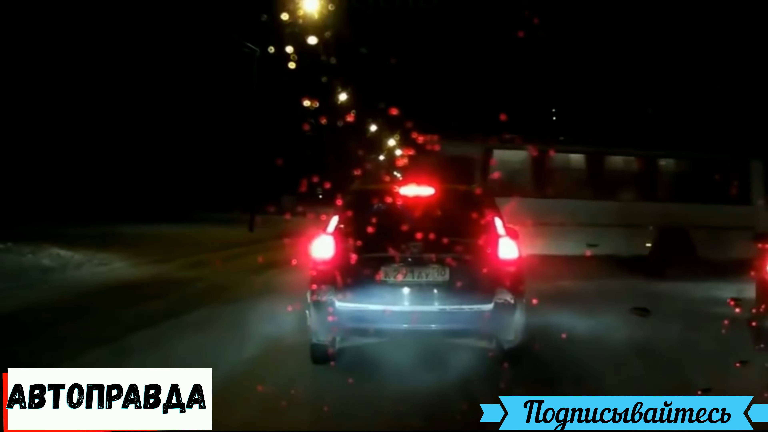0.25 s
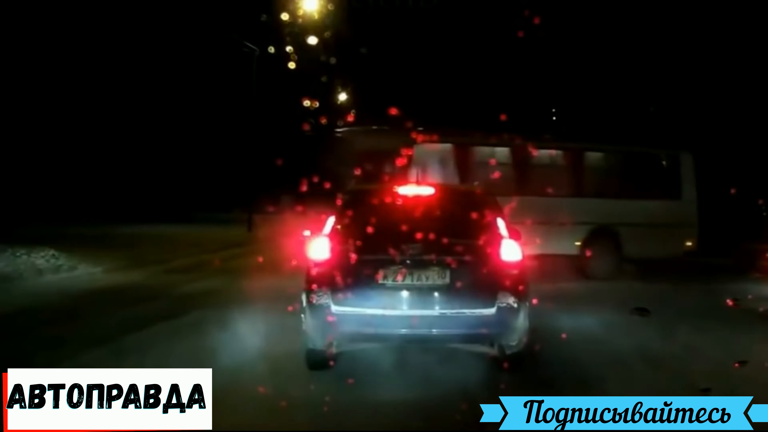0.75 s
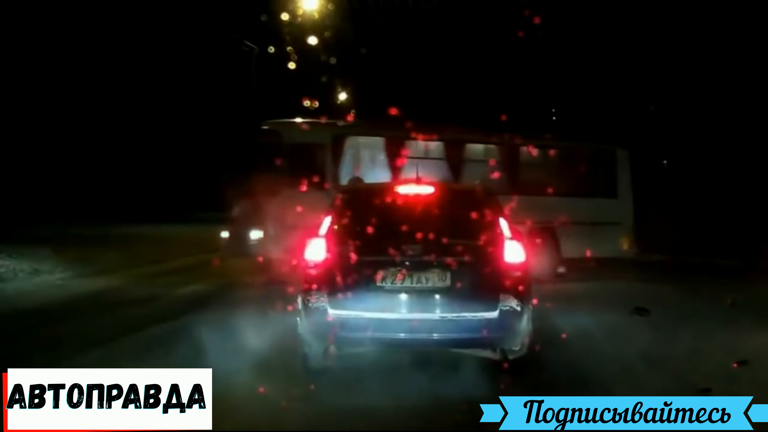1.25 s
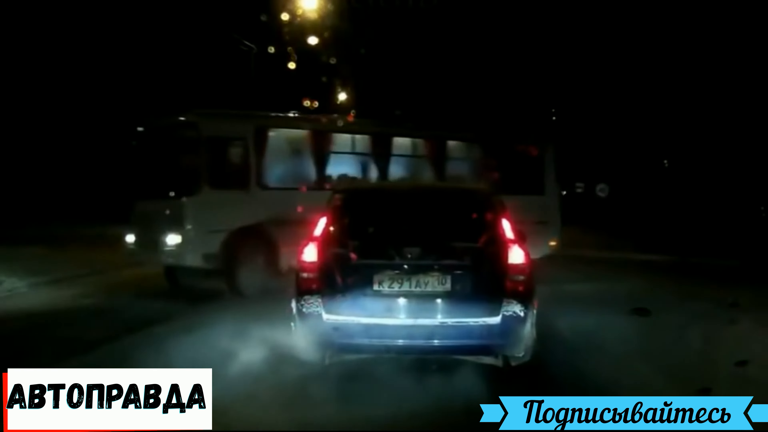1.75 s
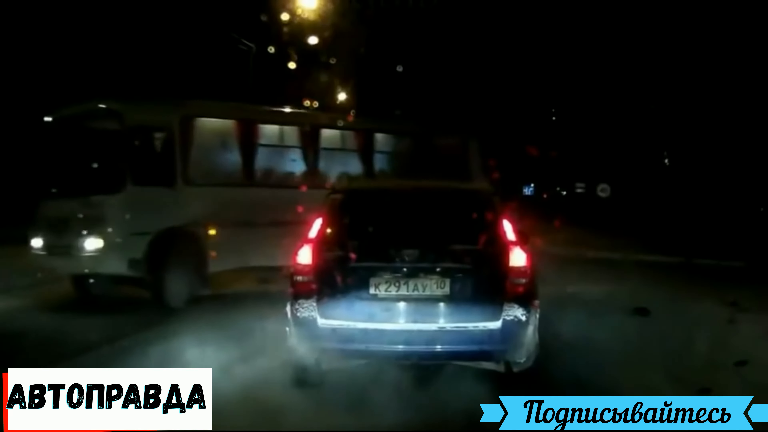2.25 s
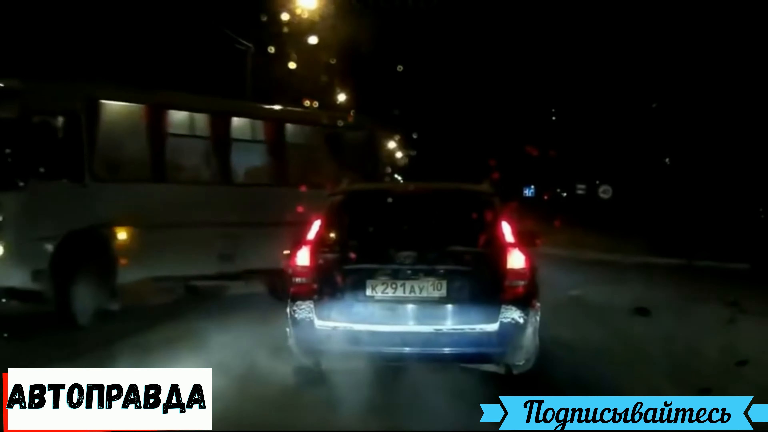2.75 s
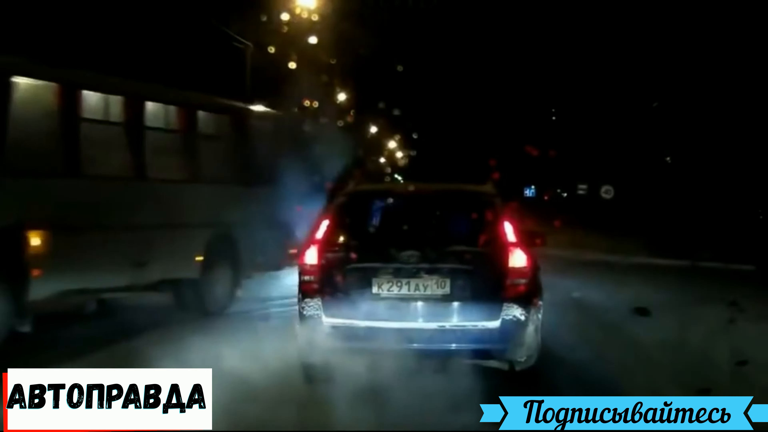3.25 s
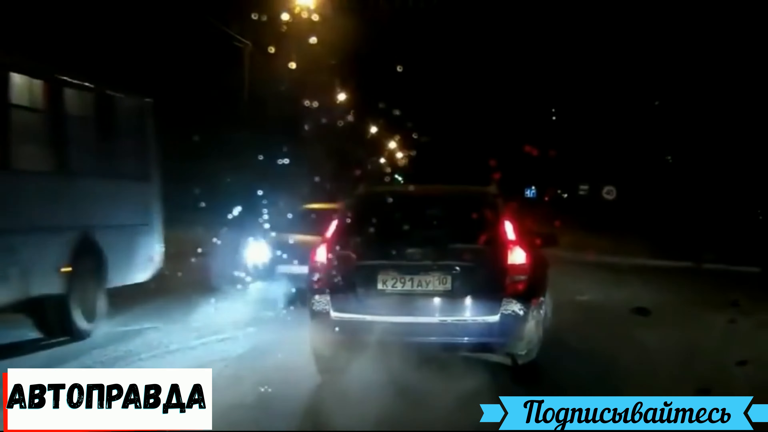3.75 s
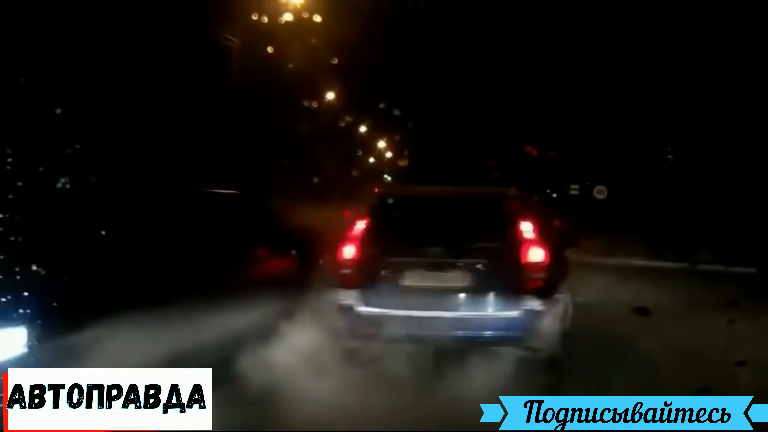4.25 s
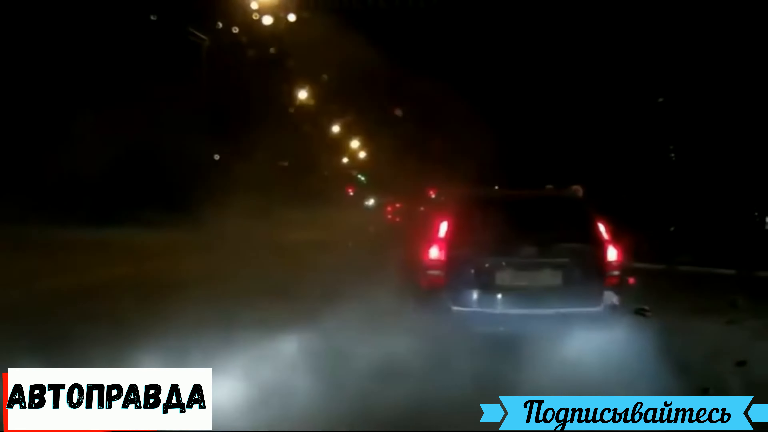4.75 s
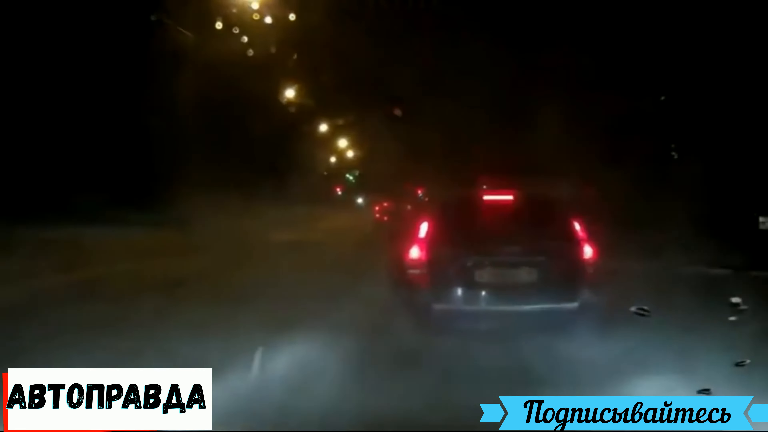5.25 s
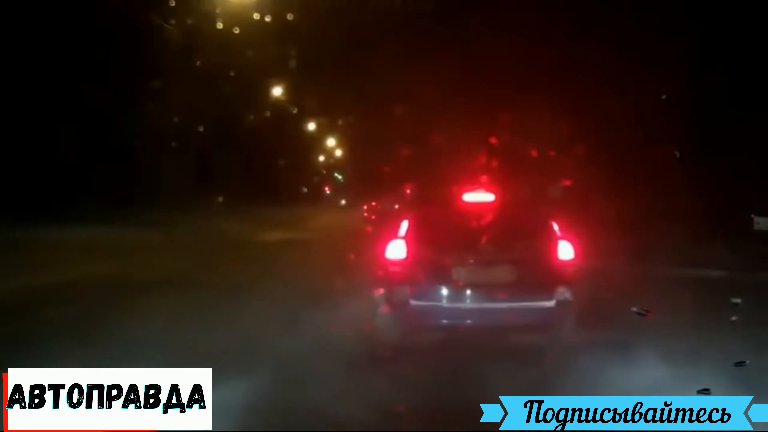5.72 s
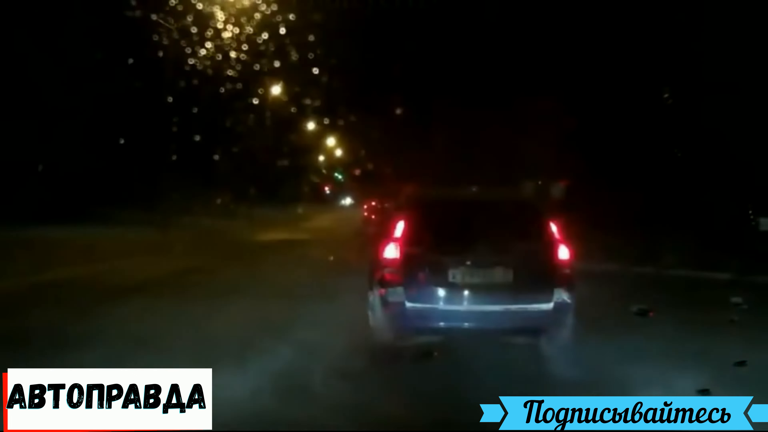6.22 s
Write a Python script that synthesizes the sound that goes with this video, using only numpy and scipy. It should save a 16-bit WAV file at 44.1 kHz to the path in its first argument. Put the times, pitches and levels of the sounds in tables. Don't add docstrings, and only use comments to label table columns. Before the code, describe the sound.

Quiet cabin rumble and fan noise, a bus engine passing, a short skid, two violent crunching metal blows, then sharp debris clicks on the road.

```python
import sys
import numpy as np
from scipy import signal
from scipy.fft import rfft, irfft
from scipy.io import wavfile
from scipy.ndimage import uniform_filter1d

SR = 44100
rng = np.random.default_rng(int(sys.argv[2]) if len(sys.argv) > 2 else 0)


def ratio(d):
    e = np.asarray(d, float) / 20
    return 10 ** e


def to_wav(s):
    ch = np.atleast_2d(s).T
    pcm = np.round(np.clip(ch, -1, 1) * 32767)
    wavfile.write(sys.argv[1], SR, pcm.astype(np.int16))


N = 286089
t = np.arange(N) / SR
f = np.fft.rfftfreq(N, 1 / SR)


def unit(x):
    return x / np.sqrt(np.mean(x ** 2))


def track(rows, col):
    rows = np.array(rows)
    first, last = rows[0, 0], rows[-1, 0]
    gate = np.interp(t, [first - 0.037, first, last, last + 0.037], [0, 1, 1, 0])
    return np.interp(t, rows[:, 0], rows[:, col]), gate


def gain(rows, col):
    db, gate = track(rows, col)
    return ratio(db) * gate


def swell(rows):
    levels = []
    for start, top, attack, release, hold in rows:
        before = (start - t) / attack
        after = np.maximum(t - start - hold, 0) / release
        levels.append(top - 20 * np.maximum(before, after))
    return ratio(np.max(levels, axis=0))


def shape(points):
    hz, db = np.transpose(points)
    return ratio(np.interp(np.log(f + 1), np.log(hz), db))


def peak(hz, width):
    return 1 / (1 + 1j * (f / hz - hz / (f + 1e-9)) * hz / width)


def through(x, response):
    return unit(irfft(rfft(x) * response, N))


def body(x, modes):
    return through(x, sum(ratio(db) * peak(hz, width) ** 2 for hz, width, db in modes))


def walk(rate):
    return through(rng.standard_normal(N), 1 / (1 + (f / rate) ** 2))


def grains(rate, scatter_db, wash):
    size = ratio(scatter_db * rng.exponential(size=N))
    ticks = (rng.random(N) < rate / SR) * rng.standard_normal(N) * size
    return unit(ticks) + wash * rng.standard_normal(N)


def tone(hz, size, wobble):
    phase = 2 * np.pi * np.cumsum(hz * (1 + wobble * walk(6.13))) / SR
    return np.sqrt(2) * size * ratio(0.48 * walk(24)) * np.sin(phase)


# f/Hz, width/Hz, level/dB
FLOOR_MODES = [(116.2, 25.3, -0.5), (140.7, 15, -0.5)]
DOOR_MODES = [(198, 34, -2.5), (247, 24, -1.5), (288, 31, -5.5), (323.3, 27, -3.5)]
BUCKLE_MODES = [(404, 56, -0.5), (490, 54, -5.5), (600, 57, -5.5), (696, 98, -8.5), (874, 29, -9.5),
                (1026, 215, -16.5)]
# f/Hz, level/dB per Hz
TEAR_SPECTRA = [
    [(710, -34), (1200, -8.5), (1400, -7.5), (1580, -15), (1900, -3.5), (2040, -6), (2300, 0.5), (2940, 0), (4300, -7), (4900, -24), (6110, -53), (10300, -120)],
    [(710, -18), (1200, -6.5), (1410, -3), (1620, -11), (1770, -7), (1940, -6), (2620, -2), (2940, -6), (4200, -11), (6000, -35), (7800, -57), (13200, -120)],
]
# t/s, peak level/dB, attack/s, release/s (each per 20 dB), hold/s
FLOOR_HITS = [(4.265, -21, .065, .055, 0.041), (4.366, -21, 0.12, 0.055, .003),
              (4.505, -25, .012, .05, .012), (4.555, -16, 0.055, 0.086, 0.0034),
              (4.614, -12, 0.018, 0.125, 0.023), (4.68, -15, .1, .05, 0.049),
              (4.826, -30, 0.11, .075, .003)]
DOOR_HITS = [(4.255, -22.5, .06, 0.099, 0.066), (4.36, -33, .1, .045, 0.078), (4.54, -21, .05, .06, .03),
             (4.602, -11, 0.079, .06, 0.0033), (4.63, -11.5, .075, 0.091, 0.044),
             (4.72, -23, .1, 0.076, .06), (4.85, -35, .1, .1, .1)]
CRUMPLE = [(4.27, -18, 0.045, 0.071, 0.03), (4.36, -35, .1, .07, .06), (4.55, -21.5, .09, .13, .05),
           (4.665, -15.5, 0.17, 0.055, .01), (4.73, -30, .1, .15, 0.047), (4.85, -37, .1, 0.22, 0.08)]
RIPS = [
    [(4.255, -25, 0.035, .03, 0.035), (4.302, -23, .02, .035, .014), (4.345, -39, .03, 0.03, .016),
     (4.4, -45, .1, .05, .01), (4.438, -39, 0.06, 0.02, .003)],
    [(4.5, -34, 0.052, .2, .07), (4.65, -27.5, 0.26, 0.12, .03), (4.74, -38, .1, 0.36, 0.032),
     (4.88, -45, .1, 0.1, 0.13)],
]
BOOM = [
    (4.582, -22, 0.2, .03, .003),
    (4.64, -4.5, 0.016, 0.06, 0.043),
]


def crash():
    knocks = grains(500, scatter_db=2.5, wash=0.81)
    tearing = ratio(2.14 * walk(54)) * grains(3000, scatter_db=-6.0, wash=2.55)
    out = ratio(1.5) * tone(53.5, swell(BOOM), 0.0204)
    out = out + swell(FLOOR_HITS) * body(knocks, FLOOR_MODES)
    out = out + swell(DOOR_HITS) * body(knocks, DOOR_MODES)
    out = out + swell(CRUMPLE) * body(knocks, BUCKLE_MODES)
    for rows, spectrum in zip(RIPS, TEAR_SPECTRA):
        out = out + swell(rows) * through(tearing, shape(spectrum))
    return out


# t/s, peak level/dB, f/Hz, length/s
SQUEALS = [(3.685, -40, 3200, .02), (3.76, -50, 2300, .04), (4.252, -26, 2570, .006),
           (4.263, -24, 2870, .006), (4.278, -27, 3300, .008), (4.288, -28, 1943, .009),
           (4.305, -23, 2290, .005), (4.313, -25, 2440, .007), (4.425, -35, 3040, .005),
           (4.433, -33, 2514, .007), (4.5, -37, 2550, .006), (4.521, -22, 2600, .007),
           (4.545, -23, 2546, .008), (4.567, -29, 2270, .008), (4.579, -30, 2395, .004),
           (4.601, -28, 2290, .007), (4.617, -24, 2640, .011), (4.626, -30, 2088, .007),
           (4.651, -26, 2648, .004), (4.679, -25, 2530, .009), (4.696, -31, 2395, .005),
           (4.744, -30, 2653, .005)]
PANEL_NOTES = [(3.597, -37, 1394, .015), (3.575, -34, 242, .015), (3.62, -38, 581, .015),
               (3.637, -37, 850, .016), (3.667, -39, 796, .012), (3.68, -34, 586, .04),
               (3.47, -38, 198, .06), (4.005, -39, 1200, .02), (4.272, -10, 107, .025),
               (4.285, -21, 253, .014), (4.292, -13, 403, .013), (4.285, -20, 490, .015),
               (4.305, -11, 123, .022), (4.313, -17, 220, .02), (4.361, -17, 125, .025),
               (4.515, -12, 139, .013), (4.56, -9, 134, .018), (4.569, -20, 446, .015),
               (4.573, -22, 694, .011), (4.597, -9, 244, .019), (4.608, -15, 330, .022),
               (4.612, -25, 608, .012), (4.622, -5, 134, .017), (4.648, -14, 225, .02),
               (4.66, -15, 370, .014), (4.662, -22, 554, .009), (4.674, -24, 850, .015),
               (4.734, -14, 118, .018), (4.824, -21, 123, .018), (4.85, -32, 310, .02),
               (4.98, -38, 700, .012), (5.309, -47, 5230, .007), (5.375, -37, 3130, .012),
               (5.4, -41, 3500, .01)]


def squeals_and_panel_notes():
    rough = walk(93)
    out = np.zeros(N)
    for start, db, hz, length in SQUEALS + PANEL_NOTES:
        envelope = ratio(db + 1.8 * rough) * np.exp(-((t - start) / length) ** 2)
        out += envelope * np.sin(2 * np.pi * hz * t + 0.98 * min(hz / 2000, 1) * rough)
    return out


# t/s, peak level/dB, centre f/Hz, spread/octaves
SHARDS = [(4.972, -27, 2000, 0.9), (5.1563, -16, 4100, 0.28), (5.2794, -34, 3534, 0.39),
          (5.3495, -5.5, 3140, 0.43), (5.4645, -23, 4000, 0.65), (5.48, -8, 3800, 0.45),
          (5.4984, -25, 3900, 0.6), (5.5498, -12.5, 3500, 0.25), (5.5668, -19, 3400, 0.5),
          (5.6125, -26, 2720, 0.52), (5.654, -30, 3840, 0.5), (5.677, -33, 2600, 0.5),
          (5.7189, -31, 3740, 0.5), (5.7894, -38, 4150, 0.5), (5.842, -30, 4180, 0.44),
          (5.862, -33, 4100, .5), (5.915, -33, 4000, .4), (5.952, -32, 4040, 0.38),
          (5.9833, -28, 3940, 0.63), (6.0825, -24, 4500, 0.55), (6.094, -15.5, 2970, 0.37),
          (6.219, -30, 2940, 0.42), (6.238, -32.5, 4290, 0.38), (6.4156, -33, 2890, 0.62),
          (6.4804, -18, 4200, 0.5)]
# the same, then chatter/s
SLIPS = [(5.356, -12, 3400, 0.6, 0.004), (5.48, -27, 1400, .5, .003), (5.55, -30, 1500, .5, .003),
         (5.351, -18, 1080, 0.83, 0.0088), (5.482, -17, 3000, 0.45, 0.006),
         (5.516, -31, 2520, 0.61, 0.0037), (5.569, -21, 3600, 0.55, 0.008),
         (5.621, -27, 3980, 0.63, 0.0081), (5.692, -27.5, 3780, 0.68, 0.013), (5.54, -41, 6000, .3, .002),
         (6.0212, -15, 5200, 0.95, .007), (6.022, -28, 1200, .6, .006), (6.03, -21, 4300, 0.73, 0.006),
         (6.084, -27, 4300, .55, .006), (6.097, -25, 3100, .45, .008), (5.552, -22, 3400, .5, .005),
         (6.038, -24, 3870, 0.57, 0.004), (6.047, -36, 4800, .4, .004), (6.066, -34, 4100, .3, .002),
         (6.2, -27, 1106, 0.4, 0.03), (6.481, -28, 2055, 0.35, 0.0038)]


def shard_hit(db, hz, spread, chatter_s):
    u = np.arange(4096) / SR
    chance = rng.standard_normal((3, 60, 1))
    pitch = np.geomspace(700, 7400, num=60)[:, None] * 2 ** (0.01 * chance[0])
    octaves = np.log2(pitch / hz) / max(spread, 0.3)
    weight_db = -9 * np.abs(octaves) ** 1.53 - 8 * np.maximum(octaves, 0) + 4 * chance[2]
    t60 = 0.004 * 2 ** (0.4 * chance[1])
    envelope = (1 - np.exp(-u / 0.00028)) * np.exp(-np.log(1000) * u / t60)
    modes = np.sum(envelope * ratio(weight_db) * np.sin(2 * np.pi * pitch * u), axis=0)
    contacts = 0.27 * rng.standard_normal(2048) ** 3 / 3 + rng.standard_normal(2048)
    contacts = contacts * np.exp(-u[:2048] / chatter_s)
    contacts[0] += 4.3 * ratio(min(db + 13, 0))
    hit = signal.fftconvolve(modes, contacts)[:4096]
    return hit / np.abs(hit).max()


def stirred_grit(landings):
    grit = through(grains(600, scatter_db=1.0, wash=2.0), (peak(3840, 1500) + 1.14 * peak(2680, 1300)) ** 2)
    since = t - 4.95
    stir = np.clip(since / 0.021, 0, 1) * ratio(-51.5 - 0.8 * since)
    share = 1 / (0.098 * SR)
    kick = np.sqrt(np.abs(signal.lfilter([share], [1, share - 1], landings ** 2)))
    return (stir + ratio(-23) * kick) * ratio(1.7 * walk(25)) * grit


# t/s, peak level/dB, f/Hz, ring length/s (each ring dies away by 60 dB in
RINGS = [(4.972, -31, 1300, .03), (4.994, -35, 3750, .03), (5.1556, -20, 4320, .022),
         (5.1556, -28, 3600, .02), (5.157, -34, 2170, .03), (5.3495, -16, 4270, .02),
         (5.35, -14, 3080, .025), (5.352, -12, 2140, 0.024), (5.352, -20.5, 1440, .03),
         (5.351, -21.5, 906, 0.039), (5.3567, -18, 4260, .02), (5.356, -22, 3440, 0.027),
         (5.4643, -29, 3340, .025), (5.468, -33, 2340, .05), (5.4797, -13.5, 4100, .022),
         (5.4795, -17, 3640, .018), (5.4797, -16, 2670, 0.022), (5.486, -28, 3260, .03),
         (5.5497, -18, 3220, .03), (5.5495, -22, 3800, .018), (5.5675, -20, 3060, .025),
         (5.569, -25, 4350, 0.027), (5.572, -20.5, 2355, 0.051), (5.585, -34, 2580, .08),
         (5.677, -36, 1900, 0.043), (5.6905, -34, 3400, .025), (5.985, -36, 4000, .035),
         (6.0225, -21, 4250, .02), (6.0315, -26, 4200, .025), (6.024, -30, 2760, .05),
         (6.086, -30, 3375, .03), (6.0942, -23, 2810, 0.027), (6.0944, -28, 3360, .025),
         (6.4803, -28, 3930, .03), (6.4803, -30, 1950, .04)]


def shards():
    out, u = np.zeros(N + 8192), np.arange(4096) / SR
    clean = [row + (0.0025,) for row in SHARDS]
    for start, db, hz, spread, chatter_s in clean + SLIPS:
        i = int(start * SR)
        out[i:i + 4096] += ratio(db - 1.5) * shard_hit(db, hz, spread, chatter_s)
    for start, db, hz, t60 in RINGS:
        i = int(start * SR)
        envelope = (1 - np.exp(-u / 0.0004)) * np.exp(-np.log(1000) * u / (0.62 * t60))
        out[i:i + 4096] += ratio(db + 2.5) * envelope * np.sin(2 * np.pi * hz * u)
    tail = rng.standard_normal(4096) * np.exp(-np.log(1000) * u / 0.099)
    tail = tail / np.sqrt(np.sum(tail ** 2))
    wet = out + ratio(-11) * signal.fftconvolve(out, tail)[:len(out)]
    ahead = rng.standard_normal(900) * np.linspace(0.3, 1, num=900)
    ahead = ahead / np.sqrt(np.sum(ahead ** 2))
    early = ratio(-17) * signal.fftconvolve(out, ahead)[900:N + 900]
    return wet[:N] + early + stirred_grit(out[:N])


# f/Hz, level/dB per Hz
SPRAY = [(820, -47), (1400, -11), (1510, -4.5), (2010, -4), (2450, 1.5), (3300, -1.5), (4480, -9),
         (5500, -24), (7150, -17), (12100, -120)]
# f/Hz, width/Hz, level/dB
ARCH = [
    (606, 155, 2.5),
    (793, 260, 0),
    (1285, 380, -3),
    (1620, 570, -12),
]
# t/s, peak level/dB, attack/s, release/s (each per 20 dB), hold/s
SKIDS = [(3.2, -53.5, 0.91, .9, 1), (3.31, -49.5, 0.28, .06, .1), (3.557, -40.5, .02, 0.049, .05),
         (3.615, -37, 0.099, 0.034, 0.09), (3.908, -40.5, 0.14, .06, 0.01), (3.94, -39, .012, .07, .012),
         (4.016, -37.5, .11, 0.16, 0.037)]
FLUNG_ICE = [(3.33, -56.5, 0.1, .06, 0.049), (4.304, -50.5, 0.21, .06, .003), (4.428, -47, 0.1, 0.47, .003),
             (4.656, -35.5, .065, 0.064, .003), (4.754, -49, .08, 0.26, .003),
             (5.014, -51, .045, .03, .003)]
JUDDER = [
    (3.6, -25, .045, 0.044, .02),
    (3.688, -26.5, 0.027, .09, 0.0195),
]


def slide():
    slush = grains(4000, scatter_db=1.8, wash=1.7)
    skid, full = swell(SKIDS), ratio(-37)
    spray = skid * through(slush, shape(SPRAY))
    scrub = ratio(2) * full * (skid / full) ** 1.63 * body(slush, ARCH)
    sleet_size = ratio(-5) * full * (skid / full) ** 1.55 + swell(FLUNG_ICE)
    sleet = sleet_size * through(slush, peak(4440, 3800) ** 2)
    judder_hz = 176.5 + 18 * np.exp(-((t - 3.69) / 0.027) ** 2)
    return spray + scrub + sleet + tone(judder_hz, swell(JUDDER), 0.0202)


# t/s, firing f/Hz, level/dB
OWN_ENGINE = [
    [(0, 27.1, -39), (1.5, 27, -37), (3.4, 26.3, -36), (3.65, 28, -44), (4.15, 28.54, -29),
     (4.4, 29.9, -22)],
    [(4.8, 38.92, -28.5), (5.1, 37.5, -23.5), (5.146, 38.8, -42), (5.25, 44.8, -25), (5.434, 39.9, -32),
     (5.592, 33.1, -27.5), (5.776, 32.02, -25.5), (6.344, 31.57, -32), (6.487, 30.2, -26.5)],
]
# t/s, f/Hz (firing pitch of the bus), level/dB,
# load/dB (second order over the first)
BUS = [(1.1, 66.9, -39, -8.5), (1.59, 61.1, -37, -7), (1.75, 65.95, -46, -12), (1.95, 60.77, -44.5, 0),
       (2.4, 55.98, -30.5, -13), (2.64, 50.56, -51.5, -1), (2.75, 49.47, -35, -3), (3.1, 55.63, -30.5, 0),
       (3.52, 69, -39.5, 0), (3.76, 63.52, -28, -12), (4.01, 50.7, -31, -9), (4.18, 55.6, -23, -9.5),
       (4.3, 59.33, -18.5, 5.5), (4.47, 64.6, -30, -23)]


def engines():
    own = 0
    for rows in OWN_ENGINE:
        hz, size = track(rows, 1)[0], gain(rows, 2)
        own = own + tone(1.1 * hz, size, 0.0179) + ratio(-12.5) * tone(2 * hz, size, 0.018)
    hz, size = track(BUS, 1)[0], gain(BUS, 2)
    loaded = size * ratio(track(BUS, 3)[0])
    fourth = 4 * hz
    buzz = ratio(-1.5) / (1 + ((fourth - 198) / 9.5) ** 2) ** 2 + ratio(-24)
    bus = tone(hz, size, 0.013) + tone(2 * hz, loaded, 0.011) + tone(fourth, loaded * buzz, 0.00855)
    return own + bus


# f/Hz, level/dB per Hz
FAN = [(76, -36), (130, 3), (154, -10), (186, -5), (446, -0.5), (558, -6.5), (697, -5.5), (772, -13.5),
       (1130, -21.5), (1610, -20), (2160, -24.5), (2790, -23.5), (7800, -45), (10100, -70), (17200, -120)]
# f/Hz, width/Hz, level/dB over the fan noise
DUCTS = [(263, 32, 5), (457, 64, 2), (696, 21, 4), (959, 35, 7), (1234, 24, 8), (1396, 30, 7),
         (1620, 82, 7), (2390, 150, 2), (2800, 300, 3), (3080, 200, -2), (3500, 86, 4)]
# f/Hz, level/dB
WHINE = [
    (5130, -86),
    (5158, -84),
    (5184, -80),
]
# t/s, level/dB
RUMBLE = [(0.0, -30), (2.3, -30), (3.7, -26), (4.05, -27), (4.85, -27), (5.0, -24), (5.7, -27.5),
          (6.49, -29)]
# f/Hz, level/dB per Hz
ROAD = [(12, -44), (20, -2.5), (35, -4.5), (49, -2.5), (107, -10), (156, -20.5), (183, -20), (200, -16),
        (260, -45), (440, -120)]


def cabin():
    ducts = 1 + sum((ratio(db) - 1) * np.abs(peak(hz, width)) ** 2 for hz, width, db in DUCTS)
    fan = ratio(-37.5 + 0.32 * walk(29)) * through(rng.standard_normal(N), shape(FAN) * ducts)
    whine = 0
    for hz, db in WHINE:
        size = ratio(db + 4.5 + 3.5 * walk(4))
        whine = whine + size * np.sin(2 * np.pi * hz * t + 1.5 * walk(5.4))
    rumble = ratio(track(RUMBLE, 1)[0] - 4) * through(rng.standard_normal(N), shape(ROAD))
    return fan + whine + rumble


def scene():
    return (crash() + squeals_and_panel_notes() + shards() + slide() + engines() + cabin())[None]


def roll_off(x):
    return signal.sosfilt(signal.butter(12, 15410, fs=SR, output="sos"), x)


def record(dry):
    sample_hz = 16000
    limit = sample_hz / 2
    ends = np.minimum(np.minimum(t, t[-1] - t) / 0.003, 1)
    x = ends * dry[0] / (1 + np.abs(dry[0] / 0.97) ** 5) ** (1 / 5)
    kept = irfft(rfft(x) * (f < limit) * shape([(6500, 0), (7300, -5), (7900, -1)]), N)
    mirror_shape = (f > limit) * shape([(8000, 5.5), (9500, -5), (12000, -33), (14000, -45)])
    mirror = irfft(rfft(kept * np.cos(2 * np.pi * sample_hz * t)) * mirror_shape, N)
    loud = np.sqrt(uniform_filter1d(x ** 2, size=1024) + 1e-12)
    hiss = through(rng.standard_normal(N), shape([(4000, -5), (8000, -0.5), (14000, 0.5)]))
    hiss = (ratio(-60.5) + ratio(-51.5) * loud) * hiss
    notch = 1 - 0.71 * np.exp(-((f - limit) / 450) ** 2)
    x = irfft(rfft(kept + mirror + hiss) * notch * (f < 14100), N)
    mix = np.clip(1.013 * x, -1, 1)[None]
    return roll_off(mix)


dry = scene()
out = record(dry)
to_wav(out)
```